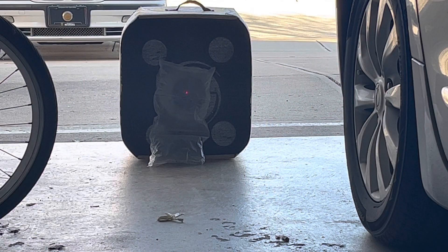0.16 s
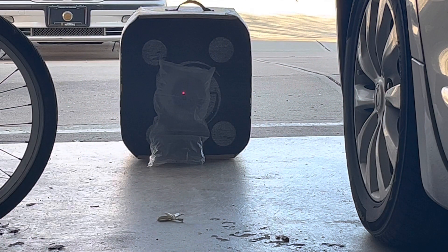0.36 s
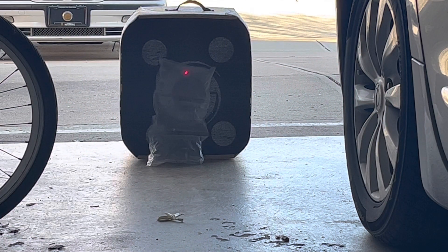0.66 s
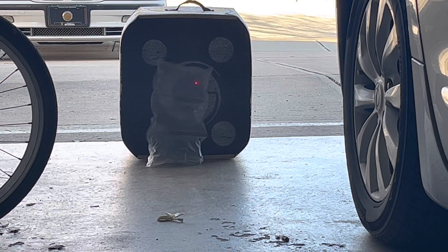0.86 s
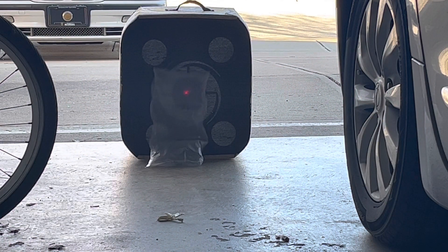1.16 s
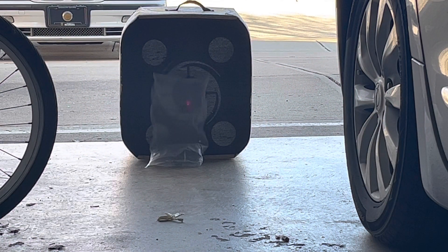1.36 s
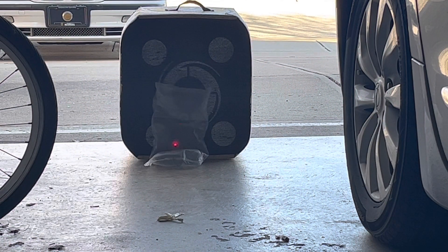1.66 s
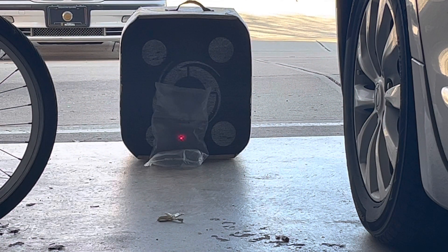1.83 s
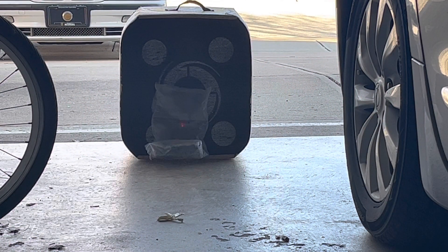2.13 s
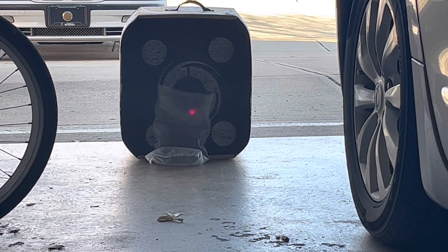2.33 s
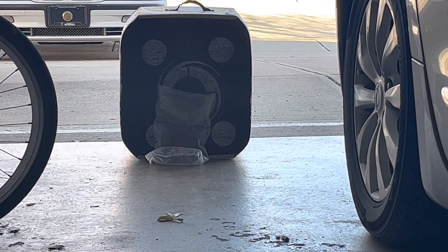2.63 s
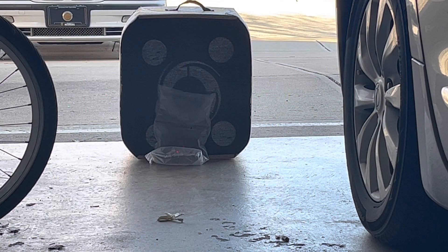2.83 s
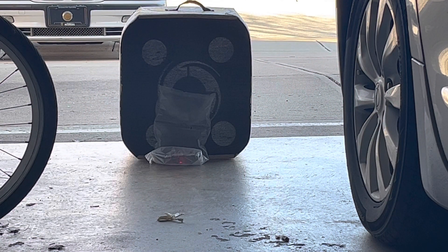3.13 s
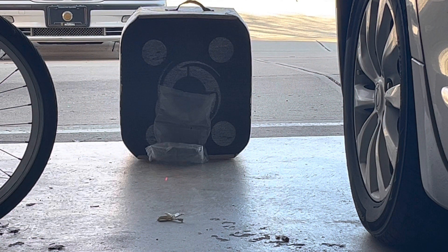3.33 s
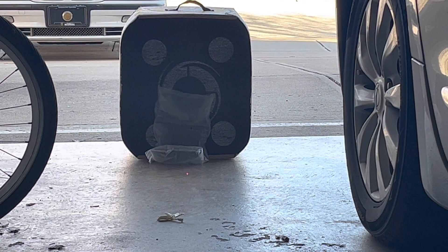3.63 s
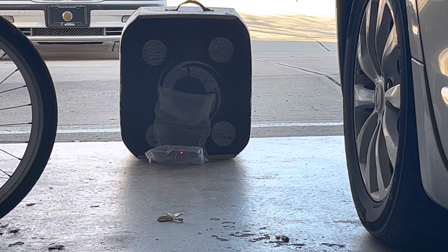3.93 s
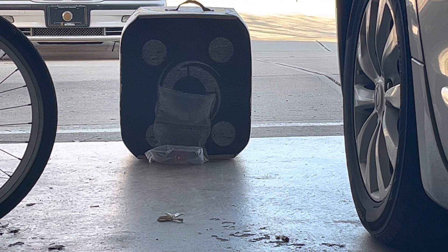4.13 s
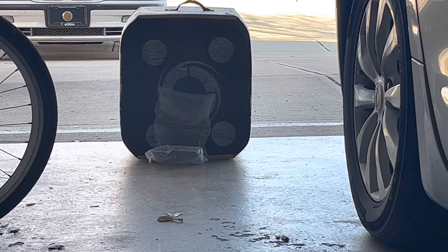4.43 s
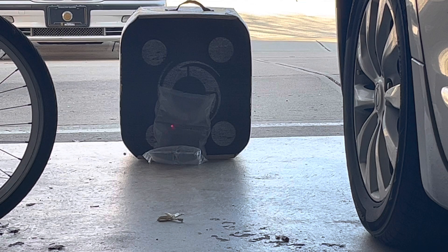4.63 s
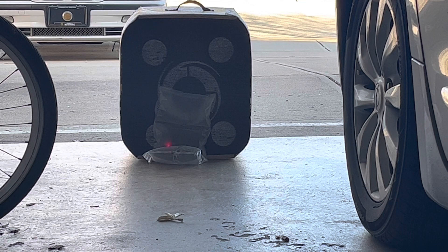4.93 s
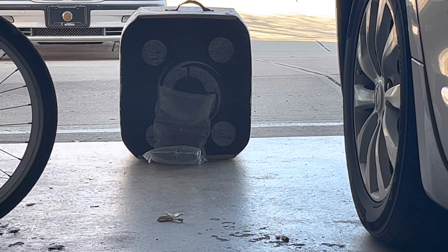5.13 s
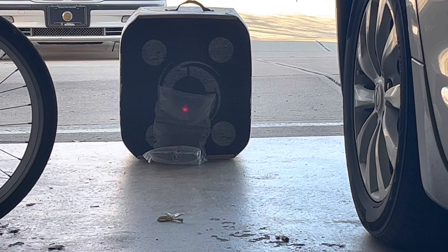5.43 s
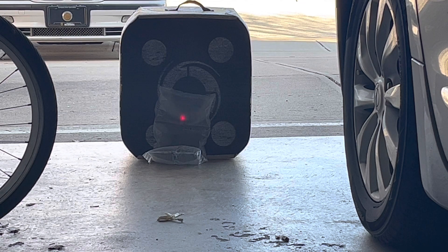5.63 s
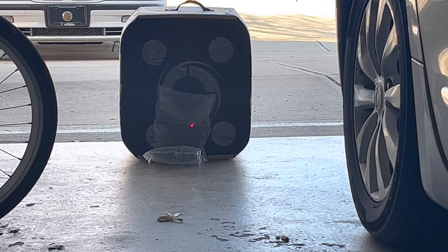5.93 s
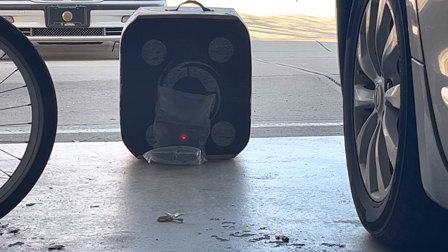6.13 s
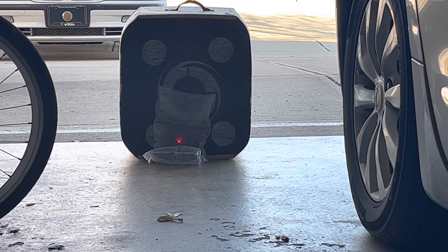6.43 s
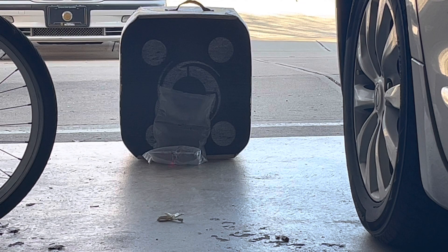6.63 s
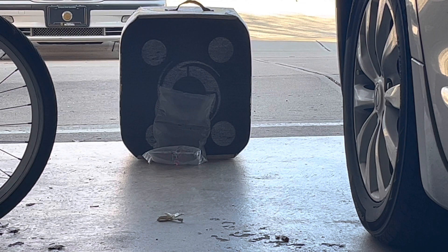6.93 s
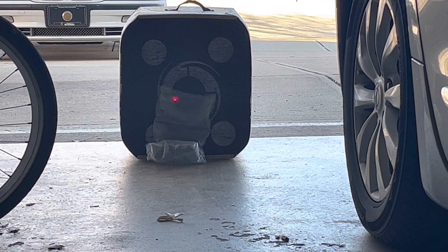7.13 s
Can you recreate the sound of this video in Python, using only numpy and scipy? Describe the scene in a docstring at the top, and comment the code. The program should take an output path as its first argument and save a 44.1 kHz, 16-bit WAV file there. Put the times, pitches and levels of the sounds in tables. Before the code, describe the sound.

Six loud single cracks from a gas-powered toy pistol ring in a hard garage, with small trigger clicks and a brief plastic-bag crinkle between.

```python
"""First a low hum and faint street noise through the open door of a garage, with thin whines and a whistle.
Then a gas airsoft pistol fires six single shots at a plastic bag target, close by and heard in stereo.
Coloured noise bursts make the hammer knock, crack, gush of gas, slide slam and trigger click; metal rings as dying sines.
Smooth pushes make thumps, shoved air and handling bumps; two beating tones boom; grains of noise make the bag crinkle.
Echoes, a decaying noise tail and ringing modes make the garage around pistol and bag."""
import sys
import numpy as np
from scipy import signal
from scipy.fft import rfft, irfft, next_fast_len
from scipy.io import wavfile

SR = 44100
rng = np.random.default_rng(int(sys.argv[2]) if len(sys.argv) > 2 else 0)


def dump(signal):
    """Clip the signal to [-1, 1] and save it as 16-bit WAV at the path in sys.argv[1]."""
    limited = np.clip(np.atleast_2d(signal).T, -1, 1)
    pcm = np.round(limited * 32767).astype(np.int16)
    wavfile.write(sys.argv[1], SR, pcm)


N = 320607

# Table levels are relative: each layer adds its own gain, and the final stereo stage colours the sum.

# background hum, colour: [f/Hz, level/dB per Hz]; course: [t/s, level/dB]
HUM_COLOUR = [(15, -31), (32, -13), (47, 0), (80, -3), (120, -11), (200, -22), (500, -37), (1500, -42),
              (3000, -54), (8000, -64.5), (16000, -61.5)]
HUM_COURSE = [(0, -56), (.6, -54.5), (1.3, -67), (7.2, -63.5)]
# street noise, colour: [f/Hz, level/dB per Hz]; its sinking floor under the swells: [t/s, level/dB]
STREET_COLOUR = [(100, -22.5), (250, -11), (420, 5), (620, -1), (820, 3), (1150, -2.5), (1500, -9.5),
                 (1950, -13.5), (2300, -26), (6000, -44.5), (16000, -61)]
STREET_COURSE = [(0, -63.5), (1.25, -78.5), (2.3, -75.5), (4.3, -77), (5, -85), (7.2, -95)]
# street swells: [t of the noise top/s, half-length/s, noise level/dB, whine level/dB]
STREET_SWELLS = [(0.457, 0.12, -65.5, -64.5), (1.72, .17, -74.5, -75.5), (3.038, 0.063, -69.5, -83.5),
                 (4.116, .1, -71, -86), (5.395, 0.14, -81, -98), (6.604, 0.077, -83, -100)]
# thin far whines: [f/Hz, level/dB]
FAR_WHINES = [(390, -9.5), (790, -.5), (1130, -2), (1190, -1.5)]
WHINE_LAG_S = 0.03  # the whines top out this long after the noise
# faint high whistle that fades slowly, then stops
WHISTLE_HZ, WHISTLE_DB, WHISTLE_FADE_DB_PER_S = 1975, -79.5, 4.5
WHISTLE_END_S, WHISTLE_RELEASE_S = 3.04, 0.18

# shots: [t of the crack/s, crack level/dB, hammer lead/s, hammer level/dB, factor on hammer colour f,
#         slide level/dB, push of air level/dB, garage boom level/dB]
SHOT_EVENTS = [(0.6011, -1.5, .0084, -0.5, .85, -1, 3, -3.5), (2.065, -2, .004, -0.5, 1.15, 0.5, -12, -38),
               (3.2505, -0.5, 0.0012, -8, 1, .5, -.5, -8), (4.4238, -3.5, 0.0023, -11.5, 1.2, 0, 2.5, -5),
               (5.6494, -0.5, .0024, -5, 1, -3.5, -3.5, -17),
               (7.0272, -1, 0.00148, -12, 1.2, 2.5, -2, -4.5)]
# colour of the hammer knock, before the pitch factor of each shot: [f/Hz, level/dB]
HAMMER_COLOUR = [(60, -18.5), (170, -10), (280, 4.5), (500, 3), (900, 6), (1250, -7), (1650, 0),
                 (2200, -20), (4000, -28), (16000, -58.5)]
# colour of the crack: [f/Hz, level/dB]
CRACK_COLOUR = [(60, -13.5), (180, -13), (300, 1.5), (900, -3), (1600, -1), (2200, -8), (2650, -0.5),
                (3400, 1), (4700, -0.5), (6000, -5.5), (6800, 2), (9000, -1.5), (12000, -11.5),
                (15000, -10)]
UNEVEN_DB = 2.1  # how much the colour of a crack or slam differs from blow to blow
# a harder hammer lets out a heavier thump: dB at hammer 0 dB, and dB per dB of hammer
THUMP_DB, THUMP_PER_HAMMER = 10.5, 0.33
# slide cycle of the first shot, and its lengthening with each shot as the gas cools
CYCLE_S, SLOWING_S_PER_SHOT = .0494, .0008
VENT_SHARE = .255  # share of the cycle after which the breech opens and vents
# colour of the gas: [f/Hz, level/dB]
GAS_COLOUR = [(60, -3), (180, -8), (310, 11.5), (700, -8), (1100, -5), (1700, 7.5), (2500, -1), (5000, 3.5),
              (7500, 1), (11000, -7), (15000, -13)]
# a stronger push of air hisses louder: dB at push 0 dB, and dB per dB of push
HISS_DB, HISS_PER_PUSH = 11.5, 0.23
# colour of the slide slam: [f/Hz, level/dB]
SLIDE_COLOUR = [(60, -27.5), (250, -15), (600, -5.5), (1000, -3), (1500, -10.5), (2200, -1), (3100, 0.5),
                (4300, -2.5), (5300, -2.5), (7000, -5.5), (9500, -9), (15000, -20)]
# the slide rebounds after it shuts: [delay/s, level against the slam/dB]
SLIDE_REBOUNDS = [(.0075, -18.5), (.021, -19)]
# ringing of slide and frame: [f/Hz, level/dB, t60/s]
FRAME_MODES = [(1180, -2.5, 0.015), (1836, -5.5, 0.083), (2700, 2, 0.02), (3276, 7, 0.027),
               (4170, -2, 0.009), (5400, 0.5, 0.029), (6740, -1, .03)]
# two close standing waves of the garage: [low f/Hz, high f/Hz]
STANDING_WAVES_HZ = (46.6, 50.3)
# garage reverberation, decay: [f/Hz, t60/s]; colour: [f/Hz, level/dB]
REVERB_T60 = [(100, 0.78), (300, 0.3186), (700, 0.3419), (1200, 0.467), (2000, 0.404), (5000, 0.437),
              (8000, 0.3631), (14000, 0.263)]
REVERB_COLOUR = [(60, -13.5), (180, -11), (290, 3.5), (680, -3.5), (1100, -2), (1700, 0), (4000, -4),
                 (8000, -2.5), (14000, 0.5), (16000, -14.5)]
# ringing of the garage and things in it: [f/Hz, level/dB, t60/s]
GARAGE_MODES = [(309, -3, .25), (366, -2, .2), (430, -8, .16), (1015, -9, .42), (1674, -13, .45),
                (1872, -15, .45), (3194, -17, .45)]
# first reflections from floor, car and walls: [delay/s, left level/dB, right level/dB]
FIRST_ECHOES = [(.0031, -20, -13.5), (.0079, -18, -16), (0.0122, -22, -13.5), (0.0137, -18, -15),
                (.0215, -12, -16.5)]

# soft bumps of handling: [t/s, level/dB, f/Hz]
HANDLING_BUMPS = [(.962, 3.5, 169), (1.037, -5, 245.5), (2.336, -12.5, 605), (3.151, -17.5, 128.9),
                  (4.977, -8.5, 200), (5.342, -10, 127.6), (5.366, -10, 132), (6.581, -16, 124.5)]
BUMP_LAG = 1.3  # cycles by which each pitch of a bump comes late
# trigger springing back: [t/s]
TRIGGER_RESETS = [1.0371, 2.4802, 3.6668, 4.7025, 6.0632]
# colour of the trigger snap: [f/Hz, level/dB]
TRIGGER_COLOUR = [(100, -47), (850, -26), (1250, -16.5), (1850, -2.5), (2400, -1.5), (2900, -9.5),
                  (3700, -9), (5000, -11), (7000, -17.5), (9500, -18.5), (15000, -35.5)]
# ringing of the trigger linkage: [f/Hz, level/dB, t60/s]
LINKAGE_MODES = [(1560, 5, 0.058), (2030, 0.5, 0.076), (2470, -11, 0.04), (2500, -17, 0.021)]
# small plastic ticks: [t/s, level/dB]
PLASTIC_TICKS = [(1.569, -4.5), (1.686, -3.5), (3.945, -11), (5.0, -6.5), (5.135, -2.5), (5.15, -1.5),
                 (5.292, -10.5), (6.35, -12)]
# the bag slumping: [t/s, level/dB]
SLUMP_COURSE = [(1.2, -102), (1.35, -70), (1.45, -67), (1.57, -66), (1.63, -74), (1.72, -86.5), (1.8, -100)]
# colour of the plastic: [f/Hz, level/dB per Hz]
PLASTIC_COLOUR = [(200, -19), (1000, -1), (2000, 3), (5000, 0), (8000, -4), (13000, -7.5), (16000, -20.5)]

# left and right channel, likeness of diffuse sound: [f/Hz, likeness 0 to 1]
STEREO_LIKENESS = [(50, 1), (150, 1), (700, 0.13), (1300, 0.091), (1800, 1), (2400, 0.8), (4500, .92),
                   (6000, 1), (12000, 0.95), (14000, .7)]
# left and right channel, balance: [f/Hz, left minus right level/dB]
STEREO_BALANCE = [(120, -0.25), (240, -2.5), (450, -0.9), (800, -2.5), (1200, -1), (1650, -9), (2300, -1.5),
                  (4000, 0)]
# left and right channel, phase: [f/Hz, angle by which left leads/rad]
STEREO_LEAD = [(0, 0), (80, -.3), (160, -.55), (270, .25), (480, -.3), (620, .2), (850, 0), (1100, .8),
               (1550, 1.1), (1900, .2), (3200, .3), (5000, 0), (5700, -1), (6600, -1.05), (8100, -3),
               (8800, -3.2), (11200, -6.15), (12500, -6.4), (15000, -9.3)]
# a dip in the upper bass, around 185 Hz: [f/Hz, level/dB]
BASS_DIP = [(125, 1.5), (185, -4.5), (255, 0)]
EDGE_HZ = 16300  # upper band limit


def amp(db):
    """Turns a level in dB into an amplitude factor."""
    return 10 ** (np.asarray(db) / 20)


def unit(x):
    """Scales a signal to rms 1."""
    return x / np.sqrt(np.mean(x ** 2) + 1e-20)


def read(points, hz):
    """A spectrum joined by straight lines on a log-frequency axis."""
    f, value = np.transpose(points)
    return np.interp(np.log(hz + 1), np.log(f + 1), value)


def curve(points):
    """A control curve at every sample."""
    return np.interp(np.arange(N) / SR, *np.transpose(points))


def slow(size):
    """A random drift of rms 1 with a new value about every size samples."""
    return unit(signal.resample(rng.standard_normal(N // size), N))


def swell(s, half_length):
    """A smooth rise and fall of height 1 around s seconds."""
    return np.exp(-((np.arange(N) / SR - s) / half_length) ** 2)


def add(mix, s, sound):
    """Lays a sound into the mix at s seconds."""
    part = mix[max(round(s * SR), 0):][:len(sound)]
    part += sound[:len(part)]


def colour(x, points, size=4096):
    """A causal minimum-phase filter with the given spectrum."""
    log_gain = np.log(amp(read(points, abs(np.fft.fftfreq(size, 1 / SR)))))
    spectrum = np.exp(np.conj(signal.hilbert(log_gain)))
    taps = np.fft.ifft(spectrum).real
    return signal.oaconvolve(x, taps[:size // 2])[:N]


def pair(z, hz):
    """Blends two unrelated spectra into a left and right of the set likeness."""
    same = np.clip(read(STEREO_LIKENESS, hz), 0, 1)
    left = same * z[0] + np.sqrt(1 - same ** 2) * z[1]
    return np.array([left, z[0]])


def wash(points):
    """Steady diffuse noise of rms 1 with the given spectrum."""
    hz = np.fft.rfftfreq(N, 1 / SR)
    diffuse = pair(rfft(rng.standard_normal((2, N))), hz)
    return unit(irfft(diffuse * amp(read(points, hz)), N))


def bursts(rows, rise, fall, uneven_db=0, size=4096):
    """A dense rattle at each (s, dB), of unit energy before dB, swelling and dying exponentially."""
    out = np.zeros(N)
    t = (np.arange(size) - size // 4) / SR
    shape = np.exp(-np.maximum(-t / rise, t / fall))
    for s, db in rows:
        # keep only the phases of shaped noise, so that the spectrum is flat
        flat = np.exp(1j * np.angle(rfft(shape * rng.standard_normal(size))))
        ripple = signal.resample(rng.standard_normal(size // 64), len(flat))
        burst = irfft(flat * amp(uneven_db * ripple)) * np.sqrt(shape)
        add(out, s + t[0], amp(db) * burst / np.linalg.norm(burst))
    return out


def push(s, db, hz, lag_cycles, size=16384):
    """A smooth push of air around hz; each frequency lags by lag_cycles of its period, so the pitch sinks."""
    out = np.zeros(N)
    f = np.fft.rfftfreq(size, 1 / SR)
    u = 1j * f / hz
    spectrum = u / (1 + u) ** 3 / (1 + (f / (3 * hz)) ** 2) * SR / (2 * np.pi * hz)
    lag = np.exp(-2j * np.pi * lag_cycles * np.log((f + 16) / hz))
    lead_in = size // 8  # room for what sounds ahead of s
    add(out, s - lead_in / SR, amp(db) * np.roll(irfft(spectrum * lag), lead_in))
    return out


def ringing(modes):
    """Dying sines, one for each (Hz, dB, t60 s)."""
    t = np.arange(SR) / SR
    return sum(amp(db - 60 * t / t60) * np.sin(2 * np.pi * hz * t) for hz, db, t60 in modes)


def after_cracks(share):
    """When, in each shot, the slide is this share of the way through its cycle."""
    return [s + share * (CYCLE_S + SLOWING_S_PER_SHOT * k) for k, (s, *_) in enumerate(SHOT_EVENTS)]


def vents():
    """The gas leaving the open breech in each shot: (s, push of air dB, garage boom dB)."""
    return [(s, push_db, boom_db)
            for s, (*_, push_db, boom_db) in zip(after_cracks(VENT_SHARE), SHOT_EVENTS)]


def street():
    """Diffuse noise through the open door: a sinking floor and swells, their powers summed."""
    swells = sum(amp(db) * swell(s, half) for s, half, db, _ in STREET_SWELLS)
    return np.hypot(amp(curve(STREET_COURSE)), swells) * wash(STREET_COLOUR)


def whines(waver=0.0076, flutter_db=6.5):
    """Far sines wavering in pitch and level, rising just behind the street swells."""
    tones = np.zeros(N)
    for hz, db in FAR_WHINES:
        level = amp(db + flutter_db * slow(size=3000))
        pitch = hz * (1 + waver * slow(size=700))
        tones += level * np.sin(2 * np.pi * np.cumsum(pitch) / SR)
    return tones * sum(amp(db) * swell(s + WHINE_LAG_S, half) for s, half, _, db in STREET_SWELLS)


def whistle():
    """A faint steady sine whose level drifts and fades until a short release ends it."""
    t = np.arange(N) / SR
    level = amp(WHISTLE_DB - WHISTLE_FADE_DB_PER_S * t + 5.2 * slow(size=4096))
    release = np.clip((WHISTLE_END_S - t) / WHISTLE_RELEASE_S, 0, 1)
    return level * release * np.sin(2 * np.pi * WHISTLE_HZ * t)


def background():
    """Low diffuse hum under the street noise, whines and whistle."""
    hum = amp(curve(HUM_COURSE)) * wash(HUM_COLOUR)
    return hum + street() + whines() + whistle()


def hammer():
    """A short knock ahead of each crack, its resonances shifted from shot to shot."""
    out = np.zeros(N)
    for s, _, lead, db, pitch, *_ in SHOT_EVENTS:
        shifted = [(hz * pitch, level) for hz, level in HAMMER_COLOUR]
        out += colour(bursts([(s - lead, db)], rise=0.0059, fall=.002), shifted)
    return amp(18.5) * out


def crack():
    """A very short burst of noise with a bright, uneven colour."""
    rows = [row[:2] for row in SHOT_EVENTS]
    return amp(16.0) * colour(bursts(rows, rise=0.0028, fall=0.00046, uneven_db=UNEVEN_DB), CRACK_COLOUR)


def thump():
    """A sinking push of air with each crack, heavier after a harder hammer."""
    return sum(push(s, THUMP_DB + THUMP_PER_HAMMER * db, hz=415, lag_cycles=.9)
               for s, _, _, db, *_ in SHOT_EVENTS)


def gas(flutter_db=1.5):
    """A turbulent gush from the opened breech: dying noise whose level flutters."""
    rows = [(s, HISS_DB + HISS_PER_PUSH * db) for s, db, _ in vents()]
    gush = bursts(rows, rise=0.0012, fall=0.032)
    return colour(gush * amp(flutter_db * slow(size=128)), GAS_COLOUR)


def air():
    """The vented gas shoves the air in a low push, a little earlier on the right."""
    return np.array([sum(push(s - advance, db + 8.5, hz=86, lag_cycles=0.47) for s, db, _ in vents())
                     for advance in (.0045, .0051)])


def slide():
    """The slide slams shut and rebounds; each blow is coloured noise and sets the frame ringing."""
    blows = [(s + delay, db + loss_db)
             for s, (*_, db, _, _) in zip(after_cracks(0.96), SHOT_EVENTS)
             for delay, loss_db in [(0.0012, 0)] + SLIDE_REBOUNDS]
    slam = bursts(blows, rise=.0013, fall=0.0017, uneven_db=UNEVEN_DB)
    frame = signal.oaconvolve(slam, ringing(FRAME_MODES))[:N]
    return amp(18.5) * colour(slam, SLIDE_COLOUR) + amp(-31) * frame


def boom(t60=0.69, delay=0.054):
    """The two standing waves beat, so the boom swells late and then sinks."""
    out = np.zeros(N)
    t = np.arange(SR) / SR
    low, high = (np.cos(2 * np.pi * hz * t) for hz in STANDING_WAVES_HZ)
    for s, _, db in vents():
        add(out, s + delay, amp(db - 22.5 - 60 * t / t60) * (low - high))
    return out


def garage_response(build=0.0041):
    """First echoes, dense reflections dying at a rate set by frequency, and a few ringing modes."""
    t = np.arange(SR) / SR
    hz, age, z = signal.stft(rng.standard_normal((2, SR)), SR, nperseg=256)
    decay_db = 60 * age / read(REVERB_T60, hz)[:, None]
    z = pair(z, hz[:, None]) * amp(read(REVERB_COLOUR, hz)[:, None] - decay_db)
    tail = amp(-32.0) * signal.istft(z, SR, nperseg=256)[1][:, :SR]
    tail = tail + amp([[-56], [-53]]) * ringing(GARAGE_MODES)
    tail = tail * (1 - np.exp(-t / build))
    for delay, left_db, right_db in FIRST_ECHOES:
        tail[:, round(delay * SR)] += amp([left_db, right_db])
    return tail


def garage(x):
    """Each shot rings in a freshly drawn garage tail with the same echoes, decay and colour."""
    starts = [s - .1 for s, *_ in SHOT_EVENTS[1:]]
    shot = np.searchsorted(starts, np.arange(N) / SR)
    out = np.zeros((2, N))
    for k in range(len(SHOT_EVENTS)):
        own = (x * (shot == k))[None]
        out += signal.oaconvolve(own, garage_response(), axes=1)[:, :N]
    return out


def bumps():
    """Dull, sinking handling thumps, heard without the garage."""
    dull = sum(push(s, db - 17.0, hz, lag_cycles=BUMP_LAG) for s, db, hz in HANDLING_BUMPS)
    return signal.sosfilt(signal.butter(3, 520, fs=SR, output="sos"), dull)


def trigger():
    """The trigger clicks back: a snap of coloured noise that sets the linkage ringing."""
    snap = bursts([(s, -.5) for s in TRIGGER_RESETS], rise=.0016, fall=0.00106)
    linkage = signal.oaconvolve(snap, ringing(LINKAGE_MODES))[:N]
    return amp(4.5) * colour(snap, TRIGGER_COLOUR) + amp(-49.0) * linkage


def plastic():
    """Small grainy ticks, and the crinkle of the slumping bag as sparse random grains."""
    ticks = amp(-33.5) * bursts(PLASTIC_TICKS, rise=.002, fall=0.0078)
    grains = rng.standard_normal(N) * (rng.random(N) < 3000 / SR)  # about 3000 a second
    crinkle = amp(-3.5) * unit(grains) * amp(curve(SLUMP_COURSE))
    return colour(ticks + crinkle, PLASTIC_COLOUR)


def scene():
    """Pistol and plastic excite the garage; shoved air, boom, bumps and background bypass its response."""
    pistol = hammer() + crack() + thump() + gas() + slide() + trigger()
    near = pistol + plastic()
    return background() + near + air() + boom() + garage(near) + bumps()


def record(dry):
    """Deep bass is cut, left and right differ in level and phase, peaks round off; then the band limit."""
    size = next_fast_len(N + SR)
    hz = np.fft.rfftfreq(size, 1 / SR)
    bass = hz ** 3 / np.hypot(hz ** 3, 30 ** 3) * amp(read(BASS_DIP, hz))
    # half of the difference goes to the left, its inverse to the right
    half_lead = .5j * np.interp(hz, *np.transpose(STEREO_LEAD))
    half = amp(read(STEREO_BALANCE, hz) / 2) * np.exp(half_lead)
    heard = irfft(rfft(dry, size) * bass * np.array([half, 1 / half]), size)[:, :N]
    edge = signal.firwin(255, EDGE_HZ, window=("kaiser", 9), fs=SR)
    return signal.oaconvolve(np.tanh(heard), edge[None], "same")


dry = scene()
out = record(dry)
dump(out)
```